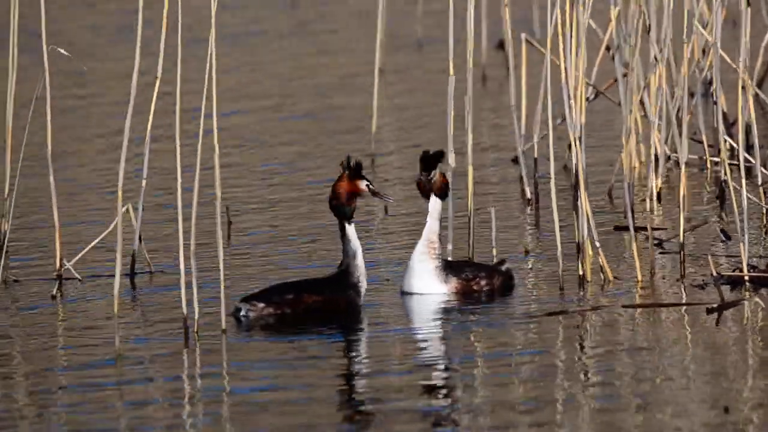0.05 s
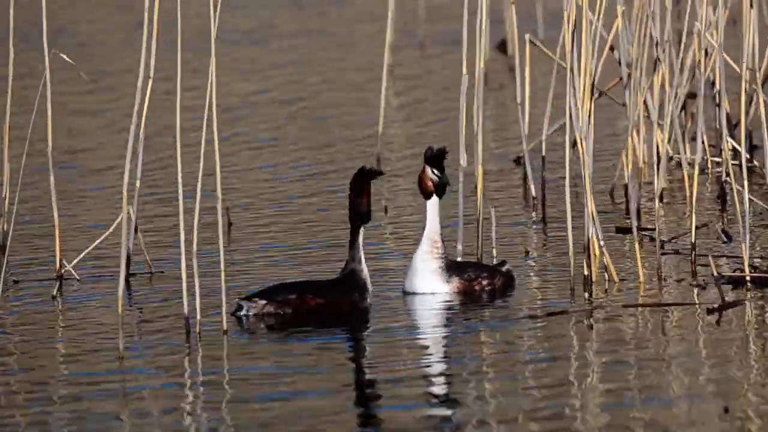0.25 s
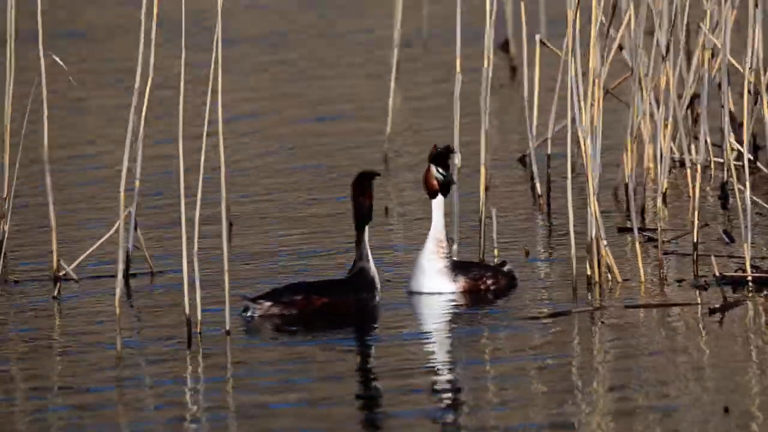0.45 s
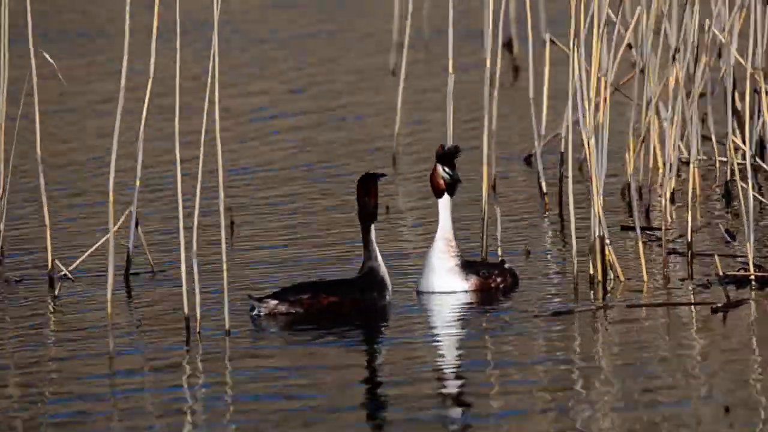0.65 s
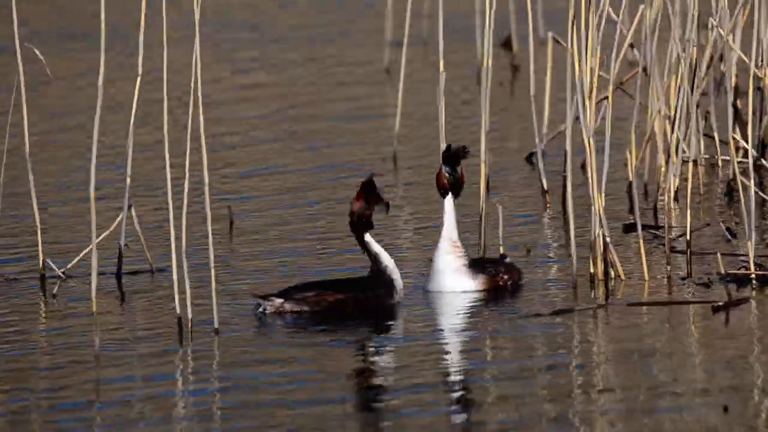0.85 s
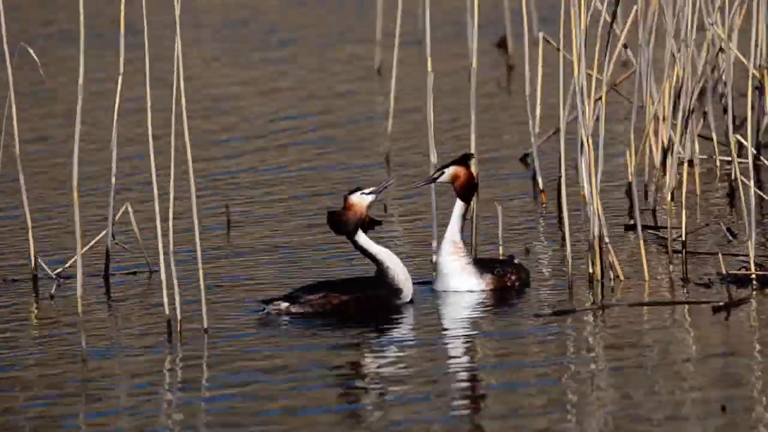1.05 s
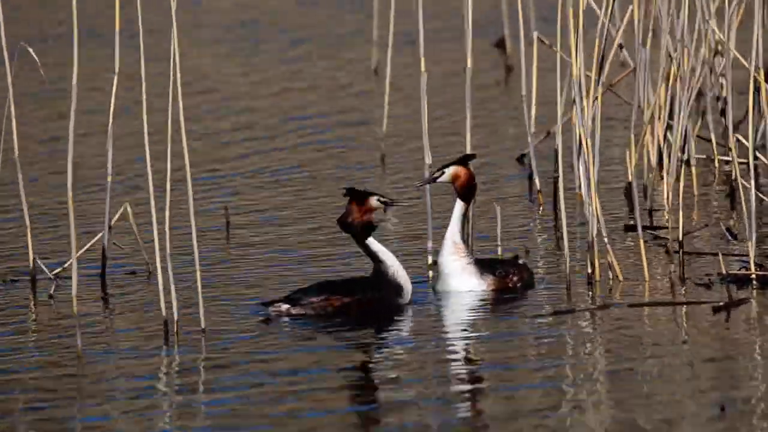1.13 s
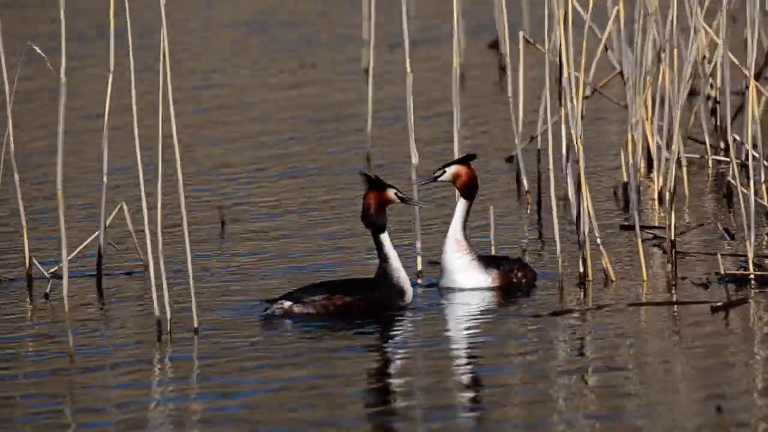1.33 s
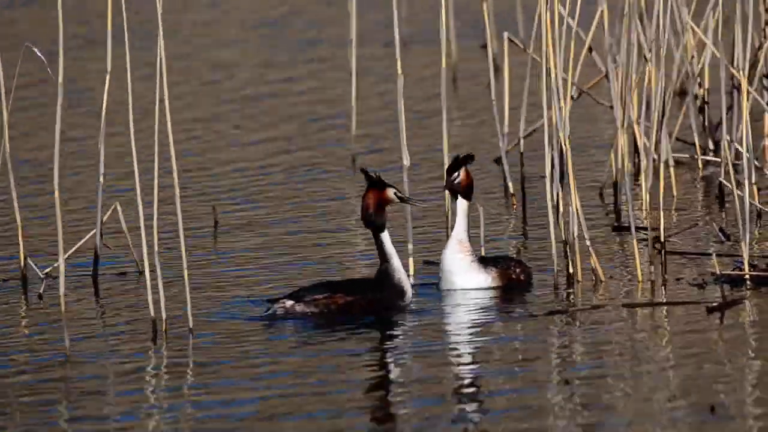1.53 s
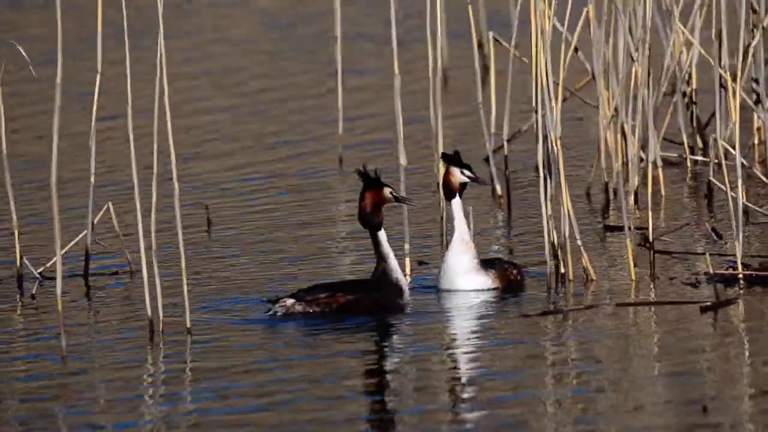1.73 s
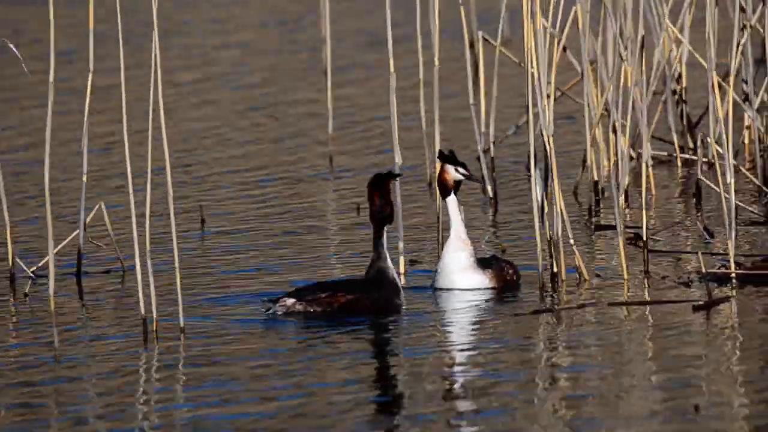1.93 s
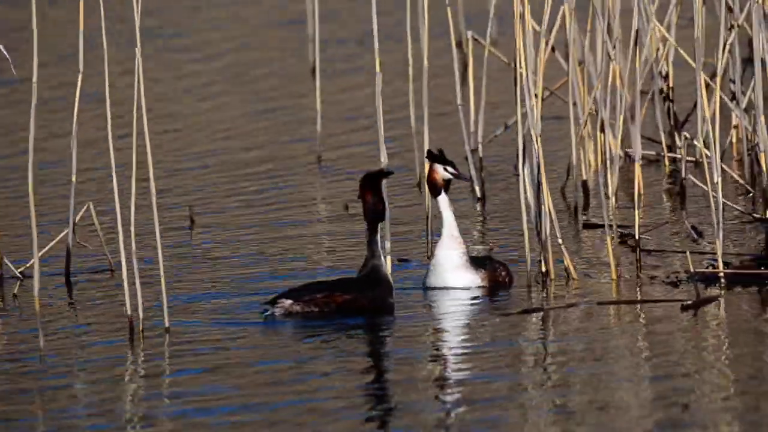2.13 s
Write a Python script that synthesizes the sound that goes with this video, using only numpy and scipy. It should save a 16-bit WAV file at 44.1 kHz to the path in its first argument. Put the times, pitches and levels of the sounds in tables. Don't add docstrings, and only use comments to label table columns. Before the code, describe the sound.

Grating nasal waterbird calls, short and throbbing, over buffeting wind rumble and a faint distant hush

```python
import sys
import numpy as np
from scipy import signal
from scipy.fft import rfft, irfft
from scipy.io import wavfile
from scipy.ndimage import uniform_filter1d

SR = 44100
rng = np.random.default_rng(int(sys.argv[2]) if len(sys.argv) > 2 else 0)


def volts_from_db(level):
    exponent = np.asarray(level, float) / 20
    return 10 ** exponent


def to_wav(s):
    ch = np.atleast_2d(s).T
    pcm = np.round(np.clip(ch, -1, 1) * 32767)
    wavfile.write(sys.argv[1], SR, pcm.astype(np.int16))


N = 97020

# frequency_hz, density_db
HUSH_SPECTRUM = [(250, -17.5), (620, -11.5), (900, 0), (1600, -11), (3200, -30.5), (5000, -46),
                 (8000, -50.5), (16000, -55.5)]
# frequency_hz, density_db
WIND_SPECTRUM = [(20, -7), (60, 0.5), (140, 0), (230, -8), (500, -22), (1500, -75)]
# time_s, level_db
GUST_LEVEL = [(.1, -47), (.17, -41), (0.269, -33.5), (0.428, -37.5), (.55, -31.5), (.7, -45.5), (.9, -33.5),
              (1.1, -37.5), (1.25, -33), (1.45, -45.5), (1.6, -36), (1.76, -43), (2.2, -43.5)]
# time_s, pitch_hz, level_db
WHISTLE_CURVES = [
    [(0, 2230, -67), (.09, 2130, -59.5), (.122, 2190, -57.5), (.14, 2020, -51), (.186, 1840, -54),
     (.2, 2040, -52.5), (.212, 1800, -61), (.225, 2000, -61.5)],
    [(1.205, 2320, -62), (1.25, 2280, -65), (1.275, 2060, -55.5), (1.326, 1900, -51), (1.342, 2150, -52),
     (1.353, 1800, -53)],
    [(1.351, 1800, -54), (1.365, 2300, -55), (1.372, 2200, -55), (1.38, 1780, -56), (1.389, 2250, -56),
     (1.396, 2300, -66)],
    [(.185, 7400, -86), (.21, 6700, -84), (.222, 6400, -88)],
    [(.555, 7000, -83.5), (.575, 7250, -97), (.61, 7450, -99), (.638, 7550, -89), (.66, 7500, -92)],
]
# centre_s, peak_db,
# swing_hz, half_length_s
BUFFETS = [(0.209, -23.5, 244, 0.0023), (0.214, -21.5, 479, 0.0028), (0.215, -11.5, 224, 0.0015),
           (0.222, -16, 205, 0.0014), (0.276, -27, 189, 0.0018), (0.296, -26, 132, 0.0018),
           (0.311, -26, 232, 0.0027), (0.318, -28, 132, 0.0021), (0.39, -14.5, 114, 0.0031),
           (0.397, -21.5, 275, 0.0012), (0.469, -19.5, 71.7, 0.012), (0.471, -19, 430, 0.002),
           (0.471, -5.5, 210, 0.0015), (0.49, -12, 274, 0.0013), (0.518, -16, 190.5, 0.0062),
           (0.519, -16.5, 91.3, 0.012), (0.529, -10.5, 274, 0.0014), (0.531, -9, 563, 0.0011),
           (0.536, -9.5, 162.5, 0.0019), (0.538, -17.5, 391, 0.0054), (0.547, -27.5, 345, 0.0039),
           (0.549, -19.5, 149, 0.0045), (0.598, -12, 213, 0.0013), (0.603, -17, 438, 0.001),
           (0.611, -26.5, 270, 0.0074), (0.612, -15.5, 118, 0.0055), (0.632, -26, 168.4, 0.011),
           (0.641, -22, 81, 0.01), (0.659, -19.5, 330, 0.0015), (0.7, -33.5, 91.6, 0.015),
           (0.759, -28, 131, 0.0047), (0.805, -26.5, 214, 0.0016), (0.813, -25, 237, 0.0041),
           (0.874, -30, 150, 0.012), (0.89, -21.5, 147, 0.0026), (0.919, -21.5, 302, 0.0021),
           (0.922, -15, 133, 0.0038), (0.936, -12.5, 104, 0.003), (0.946, -27.5, 149, 0.0025),
           (0.982, -25.5, 168, 0.0035), (0.992, -17.5, 150, 0.0022), (1.001, -14, 218, 0.0015),
                 (1.003, -23, 81, 0.0079), (1.009, -26, 212, 0.0035), (1.062, -28.5, 185, 0.0077),
                 (1.063, -21, 91.4, 0.0089), (1.098, -32.5, 168, 0.0077), (1.169, -19, 557, 0.00065),
                 (1.17, -22.0, 185, 0.011), (1.171, -28, 81, 0.011), (1.176, -24, 396, 0.0037),
                 (1.197, -22, 104.6, 0.0093), (1.213, -21, 190, 0.0034), (1.233, -16.5, 149, 0.0025),
                 (1.288, -18.0, 240, 0.0021), (1.296, -28, 337, 0.003), (1.298, -22.0, 164, 0.0059),
                 (1.31, -23.5, 189, 0.0016), (1.538, -18.5, 222, 0.0018), (1.549, -28.5, 71, 0.012),
                 (1.559, -25, 435, 0.0012), (1.608, -25, 116, 0.0053), (1.619, -24.5, 194, 0.0026),
                 (1.639, -20.5, 148, 0.0023), (1.712, -30, 168, 0.0015), (1.826, -28, 55.5, 0.0077),
                 (1.844, -33, 215, 0.012), (1.949, -26, 135, 0.0019), (1.969, -32.5, 113, 0.0069),
                 (2.011, -24.5, 101, 0.0031), (2.095, -28, 145, 0.0022), (2.168, -27.0, 116, 0.0027),
           (.022, -34.5, 200, 0.0032), (.445, -24.5, 426, 0.0015), (1.403, -30, 204, 0.0016),
                (1.432, -35, 188, .003), (.556, -28, 540, 0.0018), (0.021, -33, 80, .007),
                (.93, -20, 72, 0.0087), (1.888, -31, 108, .006), (.305, -30, 75, 0.0075),
                (0.76, -31.5, 71, 0.0089), (.906, -28, 480, 0.0011), (1.238, -33, 530, 0.0024),
                (1.845, -37, 497, 0.0027)]
# centre_s, peak_db, width_s
MEMBRANE_SNAPS = [
    (.213, -24.5, 0.00039),
    (.5317, -16, 0.00024),
    (.5375, -27.5, 0.0003),
    (.605, -30, .00028),
    (1.17, -26.5, 0.00022),
]
# time_s, pitch_hz, level_db,
# brightness_db_per_octave (above 3 kHz)
NEAR_CALL_1 = [
    (.215, 897, -57.5, -10),
    (.253, 973.5, -53, 3),
    (.313, 1044, -51, 4),
    (.353, 999, -54, 2),
    (.416, 1053, -49.5, 1.5),
    (.476, 1035, -51, 3),
    (.516, 1002, -49.5, -7),
    (.556, 888, -47.5, -8),
    (.59, 738, -65.5, -0.5),
]
NEAR_CALL_2 = [
    (.893, 898, -55.5, -7),
    (.936, 995, -50, 1.5),
    (0.977, 1055, -46.5, 2),
    (1.039, 1066, -47, 6),
    (1.115, 1115, -50, 2),
    (1.161, 1034, -48.5, 7.5),
    (1.199, 917, -51, -8.5),
    (1.23, 770, -56, -20.5),
]
NEAR_CALL_3 = [
    (1.553, 907.5, -68, 9),
    (1.573, 942, -50, 5),
    (1.593, 1006, -49, -0.5),
    (1.633, 1043, -48, 8),
    (1.756, 1022, -50, 7.5),
    (1.791, 1001, -51.5, 3),
    (1.817, 962, -54.5, 6),
    (1.841, 787, -50, -17),
]
# time_s, pitch_hz, level_db, brightness_db_per_octave
FAR_BIRD_CALLS = [
    [(.29, 842, -52, -24.5), (.324, 905, -48, -15), (.365, 941, -46.5, -21), (.402, 900, -47, -22),
     (.432, 789, -48.5, -30.), (.465, 700, -55.5, -30.5)],
    [(1.441, 860, -58, 4), (1.472, 903, -49.5, 9), (1.51, 929, -47.5, 3), (1.547, 919, -46, -7),
     (1.57, 860, -43, -10), (1.6, 790, -54, -24)],
]
# time_s, throb_count
NEAR_THROB_COUNT = [(.215, 0), (.353, 7), (.597, 19), (.893, 20), (.9356, 22), (.9986, 25), (1.1549, 33),
                    (1.2423, 37), (1.5528, 38), (1.5738, 39), (1.6353, 42), (1.793, 50), (1.8428, 52)]
FAR_THROB_COUNT = [(.288, 0), (.468, 15), (1.436, 16), (1.606, 30)]
# from_s, to_s, extra_share
DOUBLED_THROBS = [(.95, 1.01, .28), (1.05, 1.07, .35), (1.07, 1.125, 1.2), (1.125, 1.17, .5),
                  (1.585, 1.605, 1.2), (1.605, 1.625, .4), (1.625, 1.665, .1), (1.665, 1.705, .65),
                  (1.725, 1.745, .55), (1.745, 1.81, 1.1)]
# frequency_hz, gain_db
THROAT_GAIN = [(1000, -9), (2050, 3.5), (2700, -14.5), (3700, -16), (4600, -31.5), (5300, -27.5),
               (6300, -28), (9000, -61.5)]


def rms_one(x):
    return x / np.sqrt(np.mean(x ** 2) + 1e-20)


def at_hz(points, hz):
    points_hz, points_db = np.transpose(points)
    return np.interp(np.log(hz), np.log(points_hz), points_db)


def drift(rate_hz, size):
    r = np.exp(-2 * np.pi * rate_hz / SR)
    noise = rng.standard_normal(size + 9000)
    return rms_one(signal.lfilter([1], [1, -2 * r, r * r], noise)[9000:])


def span(rows):
    s, *columns = np.transpose(rows)
    n = np.arange(int(max(s[0], 0) * SR), int(s[-1] * SR))
    return n, [np.interp(n / SR, s, column) for column in columns]


def coloured(spectrum, level_db, flicker_db, flicker_hz):
    hz = np.arange(N // 2 + 1) * SR / N + 1
    shaped = rfft(rng.standard_normal(N)) * volts_from_db(at_hz(spectrum, hz))
    place = np.clip(2 * np.log2(hz / 20), 0, 20)
    out = 0
    for k in range(21):
        band = irfft(shaped * np.clip(1 - abs(place - k), 0, 1), N)
        out = out + band * volts_from_db(flicker_db * drift(flicker_hz, N))
    return rms_one(out) * volts_from_db(level_db)


def wind():
    gust_db = np.interp(np.arange(N) / SR, *np.transpose(GUST_LEVEL))
    lumps_db = 2.5 * drift(41, N)
    return coloured(WIND_SPECTRUM, gust_db + 0.5 + lumps_db, flicker_db=2.1, flicker_hz=9.7)


def distant_hush():
    return coloured(HUSH_SPECTRUM, -46.5, flicker_db=0.47, flicker_hz=6.8)


def whistles():
    out = np.zeros(N)
    for rows in WHISTLE_CURVES:
        n, (hz, db) = span(rows)
        level = np.sqrt(2) * volts_from_db(db + 1.9 * drift(60, len(n)))
        tone = np.sin(2 * np.pi * np.cumsum(hz) / SR)
        out[n] += level * tone * signal.windows.tukey(len(n), .15)
    return out


def buffets():
    sag, grit_db, grit_octaves = .12, -16.5, 1.598
    half = 2500
    t = np.arange(-half, half) / SR
    out = np.zeros(N + 2 * half)
    for s, db, hz, length in BUFFETS:
        cycles = hz * t * (1 - sag * np.tanh(t / length / 2))
        swing = np.cos(2 * np.pi * (rng.random() + cycles))
        band = signal.butter(4, [hz, hz * 2 ** grit_octaves], "band", fs=SR, output="sos")
        grit = rms_one(signal.sosfilt(band, rng.standard_normal(2 * half)))
        swell = np.exp(-(t / max(length, .0004)) ** 2 / 2)
        start = int(s * SR)
        out[start:start + 2 * half] += volts_from_db(db) * swell * (swing + volts_from_db(grit_db) * grit)
    bass_cut = signal.butter(1, 25, "high", fs=SR, output="sos")
    return signal.sosfilt(bass_cut, out[half:half + N])


def snaps():
    out = 0
    for s, db, width in MEMBRANE_SNAPS:
        u = (np.arange(N) / SR - s) / width
        out = out + volts_from_db(db) * (u ** 2 - 1) * np.exp(-u ** 2 / 2)
    return out


def voice_doubling(began):
    doubling = .12
    for from_s, to_s, share in DOUBLED_THROBS:
        doubling = doubling + share * (began > from_s) * (began <= to_s)
    return uniform_filter1d(doubling, size=40)


def line_share(k, doubling):
    if k % 2 == 0:
        return 1 / (1 + .55 * doubling * (k > 4))
    if k == 3:
        return doubling * .35
    if k > 8:
        return doubling * np.minimum(doubling + .1, 1)
    return doubling


def grebe(calls, call_dips_db, throb_count, gap, edge, arch, jitter, tuned):
    out = np.zeros(N)
    for rows, dip_db in zip(calls, call_dips_db):
        n, (hz, db, tilt_db) = span(rows)
        throbs = np.interp(n / SR, *np.transpose(throb_count))
        part = throbs % 1
        began = n / SR - part / np.maximum(np.gradient(throbs) * SR, 1)
        doubling = voice_doubling(began)
        across = 2 * part - 1
        droop = .11 * (not tuned) * across ** 4
        hz = hz * (1 + arch * (.3 - across ** 2) - droop + jitter * drift(300, len(n)))
        opening = np.clip((np.minimum(part, 1 - part) - gap / 2) / edge, 0, 1)
        gate = np.sin(np.pi / 2 * opening) ** 2
        half_phase = np.pi * np.cumsum(hz) / SR
        tone = 0
        for k in range(2, 26):
            f = hz * k / 2
            mid_band_db = dip_db * np.exp(-(np.log2(f / 3130) / 0.18) ** 2)
            beak_db = 4 * (not tuned) * np.exp(-(np.log2(f / 3854) / 0.054) ** 2)
            throat_db = at_hz(THROAT_GAIN, f * (960 / hz) ** tuned)
            bright_db = tilt_db * np.maximum(np.log2(f / 3000), 0)
            level = line_share(k, doubling) * volts_from_db(throat_db + mid_band_db + beak_db + bright_db)
            tone = tone + level * np.sin(k * half_phase + rng.uniform(0, 2 * np.pi))
        out[n] += np.sqrt(2) * volts_from_db(db) * gate * tone * signal.windows.tukey(len(n), .06)
    return out


def near_grebe():
    return grebe([NEAR_CALL_1, NEAR_CALL_2, NEAR_CALL_3], [-8, 0.5, 3.5], NEAR_THROB_COUNT,
                 gap=.16, edge=.13, arch=.075, jitter=.005, tuned=False)


def far_grebe():
    calls = grebe(FAR_BIRD_CALLS, [0, 0], FAR_THROB_COUNT,
                  gap=.04, edge=.2, arch=.035, jitter=.009, tuned=True)
    return signal.sosfilt(signal.butter(8, 4600, fs=SR, output="sos"), calls)


def pond_echo(x):
    echo_db, t60_s, cut_hz = -16, .22, 4000
    t = np.arange(SR // 2) / SR
    tail = rng.standard_normal(len(t)) * volts_from_db(-60 * t / t60_s) * (t > .004)
    tail = signal.sosfilt(signal.butter(1, cut_hz, fs=SR, output="sos"), tail)
    tail = tail / np.sqrt(np.sum(tail ** 2))
    return volts_from_db(echo_db) * signal.fftconvolve(x, tail)[:N]


def scene():
    birds = whistles() + near_grebe() + far_grebe()
    microphone_wind = wind() + buffets() + snaps()
    return (birds + pond_echo(birds) + microphone_wind + distant_hush())[None]


def roll_off(x):
    return signal.sosfilt(signal.butter(12, 15719, fs=SR, output="sos"), x)


def record(dry):
    overload, offset = 1.2, .0006
    mix = overload * np.tanh(dry / overload) + offset
    return roll_off(mix)


dry = scene()
out = record(dry)
to_wav(out)
```